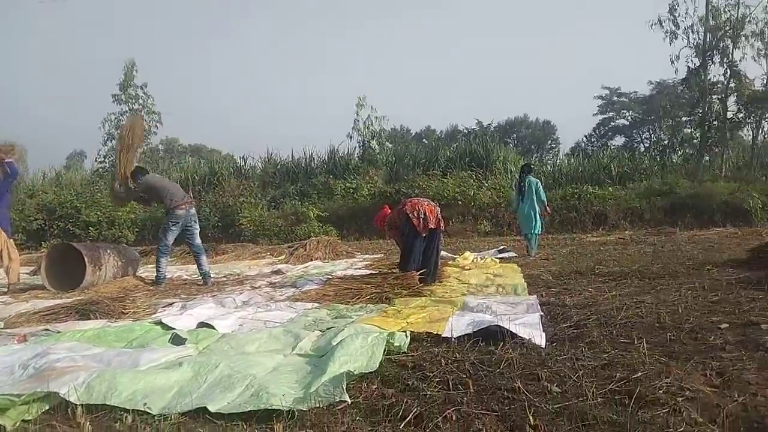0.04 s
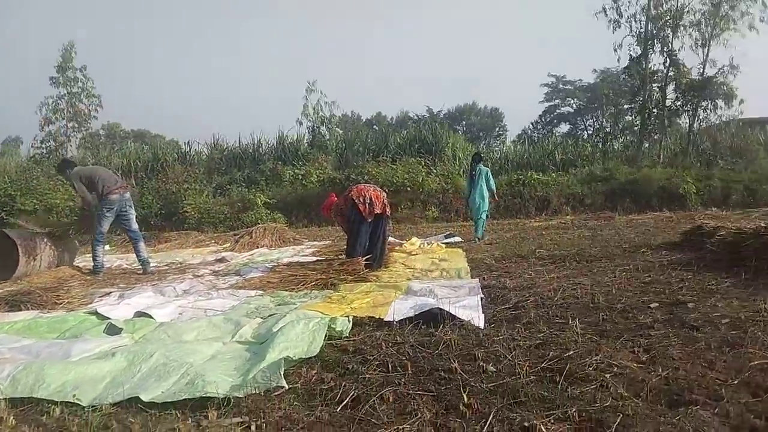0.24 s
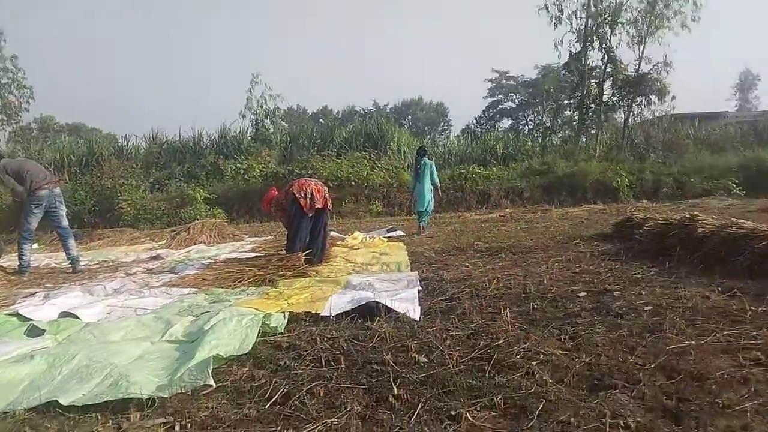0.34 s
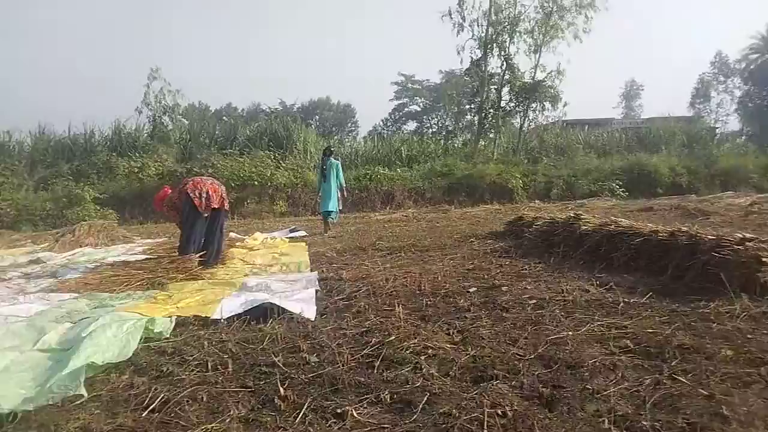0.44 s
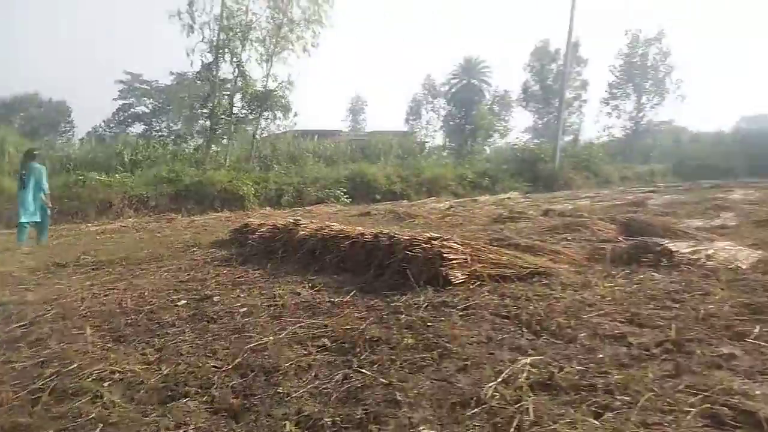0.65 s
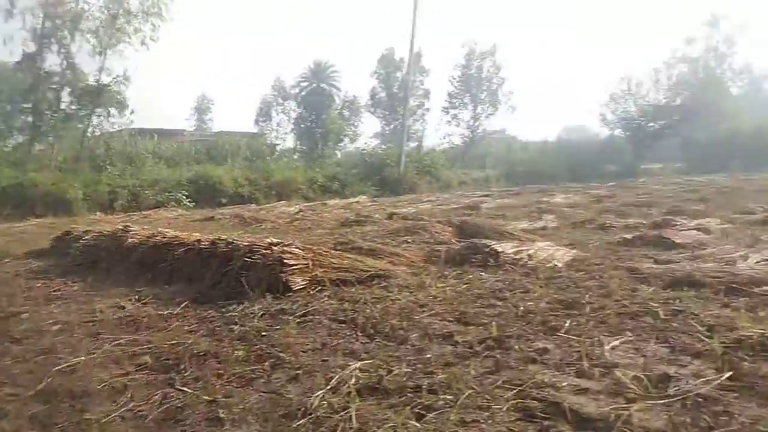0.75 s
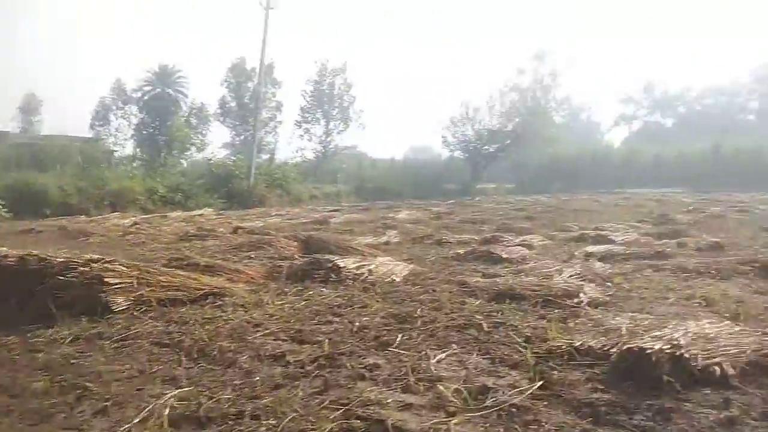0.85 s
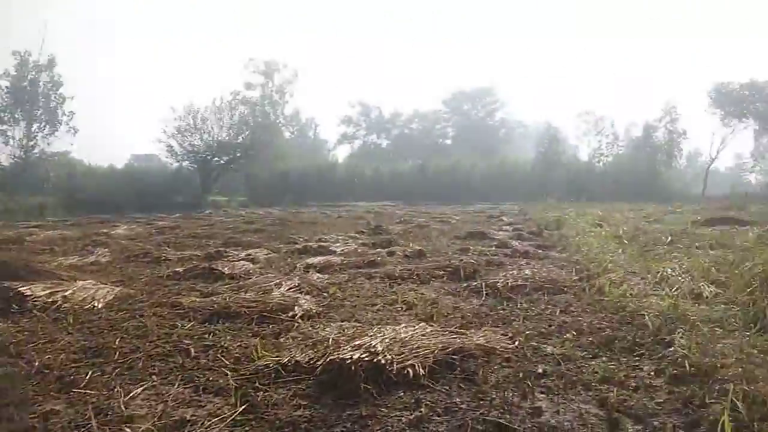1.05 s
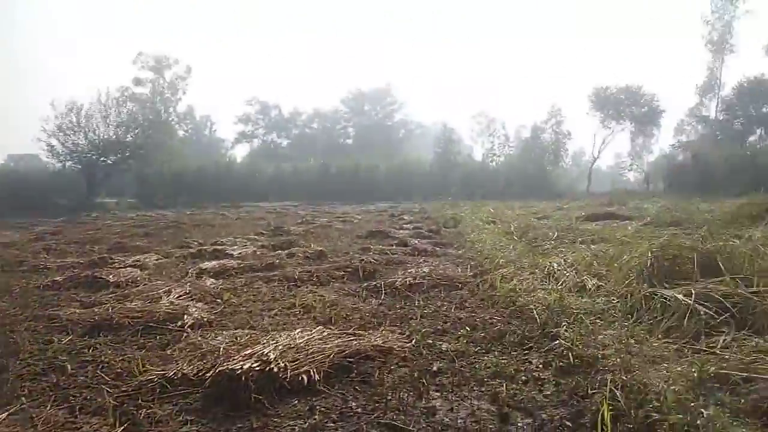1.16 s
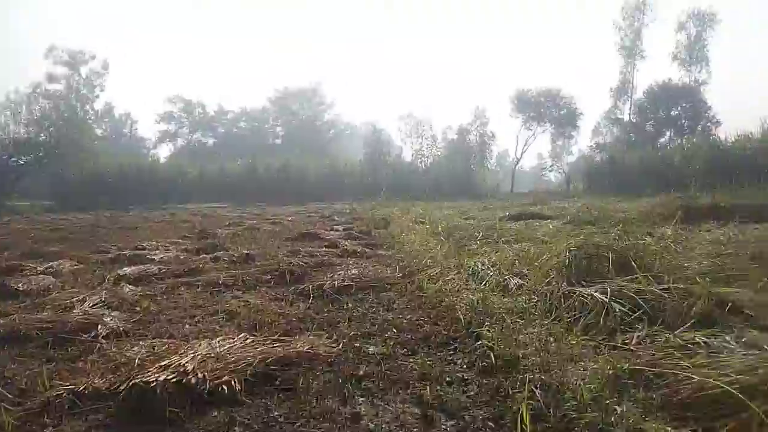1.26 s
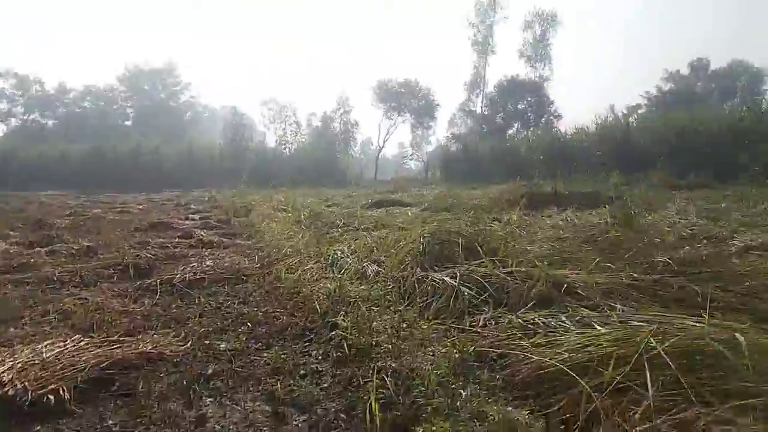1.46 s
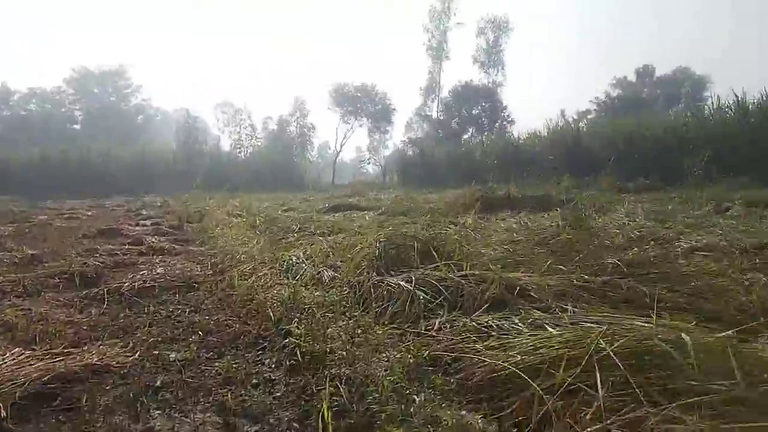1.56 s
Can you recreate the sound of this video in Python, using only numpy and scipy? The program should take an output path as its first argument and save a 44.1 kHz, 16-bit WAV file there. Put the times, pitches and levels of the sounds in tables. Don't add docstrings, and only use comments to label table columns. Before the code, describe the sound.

Rice sheaves are beaten on a hollow steel drum in an open field. Faint low engine throb and thin airy hiss run throughout. At about 0.25 s a bright slap of stalks booms and echoes, with a very faint rising swish after it; at 0.68 s a second, slightly louder, tighter blow follows. From about 1.0 to 1.6 s, close dry straw rustles, snaps and ticks increasingly.

```python
import sys
import numpy as np
from scipy import signal
from scipy.io import wavfile
from scipy.ndimage import uniform_filter1d

SR = 44100
rng = np.random.default_rng(int(sys.argv[2]) if len(sys.argv) > 2 else 0)


def invert_db(x):
    u = np.asarray(x, float) / 20
    return 10 ** u


def to_wav(sig):
    pcm = np.clip(np.atleast_2d(sig), -1, 1) * 32767
    pcm = np.round(pcm).astype(np.int16)
    wavfile.write(sys.argv[1], SR, pcm.T)


N = 70560


def evened(x):
    return x / np.sqrt(np.mean(x ** 2) + 1e-20)


def read(points, hz):
    f, value = np.transpose(points)
    return np.interp(np.log(hz + 1), np.log(f + 1), value)


def add(mix, start, sound):
    part = mix[round(start * SR):][:len(sound)]
    part += sound[:len(part)]


def grid_hz():
    return np.fft.rfftfreq(2048, 1 / SR)


def colour(x, db):
    log = np.log(invert_db(np.maximum(db, -100)))
    full = np.concatenate([log, log[-2:0:-1]])
    taps = np.fft.ifft(np.exp(full - 1j * signal.hilbert(full).imag)).real
    return signal.oaconvolve(x, taps)[:len(x)]


def ring(x, hz, width_hz):
    b, a = signal.iirpeak(hz, hz / max(width_hz, 1), fs=SR)
    return signal.lfilter(b, a, x)


def crackle(size, per_s, spread_db):
    chance, strength, sign = rng.random((3, size))
    clicks = (chance < per_s / SR) * np.sign(sign - .5)
    return evened(clicks * invert_db(-spread_db * np.log(strength * .99 + .01)))


def slow(rate_hz):
    t = np.arange(N) / SR
    rates = np.geomspace(rate_hz / 20, rate_hz, num=16)
    return evened(sum(np.sin(2 * np.pi * (f * t + rng.random())) / np.sqrt(f) for f in rates))


# frequency in Hz, level in dB per Hz.
SLAP_COLOUR = [(70, -48), (130, -16), (500, -8), (950, -19.5), (2200, -1), (4300, -11), (8000, -23.5),
               (15000, -19.5)]
# frequency in Hz, width in Hz, level in dB.
STALK_RINGS = [(1520, 160, -3), (1950, 110, -21), (2420, 170, 3.5), (3200, 300, -18), (5780, 940, -10)]


def slap(t, rise, hold, tilt_db, bundles):
    t60, treble_hz, treble_t60 = 0.13, 6100, 0.29
    bundle_s = 0.0013
    shape = np.minimum(t / rise, 1) ** 1.02 * invert_db(-60 * np.maximum(t - rise - hold, 0) / t60)
    shape *= invert_db(sum(g * np.exp(-((t - s) / bundle_s) ** 2) for s, g in bundles))
    volley = crackle(len(t), per_s=9000, spread_db=2) + 1.24 * rng.standard_normal(len(t))
    hz = grid_hz()
    sound = evened(colour(volley, read(SLAP_COLOUR, hz) + tilt_db * np.log2(hz / 2000 + .01)))
    rings = sum(invert_db(g) * ring(volley, f, w) for f, w, g in STALK_RINGS)
    sound += invert_db(-5) * evened(rings)
    body = signal.lfilter(*signal.butter(1, treble_hz, fs=SR), sound)
    treble = sound - body
    return shape * (body + treble * invert_db(2.5 - 60 * t / treble_t60))


def boom(t, rise, hold, drum):
    rise_cycles = 1.58
    out = np.zeros(len(t))
    for f, db, t60 in drum:
        swell = np.minimum(t / (rise + hold / 2 + rise_cycles / f), 1) ** 2
        fall = invert_db(db - 60 * np.maximum(t - rise - hold, 0) / t60)
        out += swell * fall * np.sin(2 * np.pi * (f * t + rng.random()))
    return out


# frequency in Hz, level in dB per Hz.
ECHO_COLOUR = [(60, -35), (146, -9.5), (230, -4.5), (450, -6), (897, -12), (1680, -4.5), (6510, -27),
               (15800, -54)]
# frequency in Hz, time to fall by 60 dB in seconds.
ECHO_T60 = [(100, 0.67), (300, 0.52), (700, 0.54), (1500, 0.39), (3000, 0.6), (7000, 0.31), (15000, 0.9)]


def echo(t):
    rise_s, far_db, far_stretch, far_top_hz = 0.0087, -10.5, 2.64, 660
    noise = evened(colour(rng.standard_normal(len(t)), read(ECHO_COLOUR, grid_hz())))
    f, frames, z = signal.stft(noise, SR, nperseg=256)
    fall_db = -60 * frames / read(ECHO_T60, f)[:, None]
    far = invert_db(far_db + fall_db / far_stretch) / (1 + (f[:, None] / far_top_hz) ** 6)
    tail = signal.istft(z * (invert_db(fall_db) + far), SR, nperseg=256)[1][:len(t)]
    return np.minimum(t / rise_s, 1) * tail


# start in seconds, slap level in dB, rise in seconds, hold in seconds,
# brightness in dB per octave.
BLOWS = [
    (0.242, -27, 0.0075, 0.013, 2.5),
    (.677, -25.5, 0.0052, 0.01, 0.9),
]
# seconds after first touch, dB over the volley
BUNDLES = [
    [(.008, 1), (.0125, 6), (.0165, 4), (.023, 2.5)],
    [(.0068, 2), (.012, 1), (.017, -2)],
]
# frequency in Hz, level in dB, 60 dB fall in seconds.
DRUM_FIRST_SPOT = [(117, 6.5, 0.035), (153, -7, 0.7), (197, -1, 0.27), (290, -8, 0.11), (395.7, 0, 0.1),
                   (381, -11.5, 0.57), (512, -4.5, 0.17), (771, 2.5, 0.07), (1100, -4.5, 0.05),
                   (1506, 3, 0.11), (1704, -2, 0.06), (1879, -10, 0.079), (2370, -15, 0.13)]
DRUM_SECOND_SPOT = [(151.2, -4, 0.11), (268, -17, 0.63), (352.6, -7.5, 0.39), (374, -8, 0.7),
                    (445, -11, 0.29), (487, -15, 0.56), (515.5, -1.5, 0.16), (600, -9.5, 0.49),
                    (651, -13.5, 0.55), (1413, -6, 0.31), (1467, -7.5, 0.33), (1601, -8, 0.4),
                    (1950, 0.5, 0.028), (2314, -1, 0.076)]
DRUM_DB = [-26.5, -27.5]
ECHO_DB = [-27.5, -27]


def blows(mix):
    t = np.arange(SR * 3 // 4) / SR
    drums = (DRUM_FIRST_SPOT, DRUM_SECOND_SPOT)
    for row, bundles, drum, drum_db, echo_db in zip(BLOWS, BUNDLES, drums, DRUM_DB, ECHO_DB):
        start, slap_db, rise, hold, tilt_db = row
        sound = invert_db(slap_db) * slap(t, rise, hold, tilt_db, bundles)
        sound += invert_db(drum_db) * boom(t, rise, hold, drum)
        sound += invert_db(echo_db) * echo(t)
        add(mix, start, sound)


# peak time in seconds, frequency in Hz, level in dB.
HEADS = [(.25, 1530, -19.5), (.2536, 2900, -20), (.2538, 1700, -20), (.2585, 1730, -14), (.2612, 2480, -18),
         (.2645, 2330, -15.5), (.2687, 1680, -23), (.2714, 1570, -31), (.2745, 1950, -25),
         (.2772, 1650, -21), (.2901, 1690, -28), (.2957, 1720, -39), (.648, 2070, -37), (.665, 3400, -42),
         (.681, 2210, -22), (.6837, 2170, -16), (.6848, 3500, -18), (.6873, 2200, -22), (.689, 2630, -19),
         (.6901, 1560, -38), (.6941, 2280, -19), (.6982, 2450, -20), (.7015, 2880, -21), (.7048, 1760, -26),
         (.7113, 1580, -25), (.716, 1520, -30), (.7196, 1550, -23.5)]
# peak time in seconds,
# frequency in Hz, level in dB.
THUMPS = [(.282, 287, -28), (.306, 188, -36), (.339, 419, -48), (.341, 156, -36), (.363, 330, -46),
          (.408, 175.3, -36.5), (.43, 258, -41), (.442, 128, -46.5), (.6905, 236, -37.5),
          (.698, 387, -31.5), (.705, 162, -33), (.72, 258, -33), (.726, 346, -30), (.728, 484, -45),
          (.7477, 600, -44), (.775, 480, -44), (.807, 366, -40), (.8345, 360, -51), (.892, 154, -49.5)]
# peak time in seconds, frequency in Hz, level in dB.
TICKS = [(1.0465, 6330, -43), (1.049, 5600, -47), (1.115, 6050, -46), (1.1175, 1175, -51.5),
         (1.131, 5450, -41), (1.1322, 3900, -40), (1.1322, 6230, -47), (1.162, 2400, -40),
         (1.172, 3040, -53), (1.2345, 6800, -55.5), (1.2767, 6310, -37.5), (1.3165, 5950, -45),
         (1.359, 3040, -42), (1.3624, 3100, -45), (1.4105, 5500, -44), (1.445, 2600, -47),
         (1.449, 3200, -46), (1.4855, 6320, -41), (1.4872, 6240, -39), (1.541, 5830, -45),
         (1.559, 5810, -43), (1.5614, 2570, -40), (1.5687, 2040, -50), (1.574, 1950, -47)]


def knocks(mix):
    for table, cycles in ((HEADS, 1.553), (THUMPS, 1.673), (TICKS, 3.53)):
        for peak, hz, db in table:
            u = np.arange(0, 9 * cycles / hz, 1 / SR) * hz / cycles
            swell = u * np.exp(1 - u)
            add(mix, peak - cycles / hz, invert_db(db) * swell * np.sin(2 * np.pi * cycles * u))


# start in seconds, length in seconds, level in dB,
# first frequency in Hz, last frequency in Hz.
SWISHES = [
    (.35, 0.21, -52, 1400, 2500),
    (.3, 0.226, -56.5, 1150, 1180),
    (1.7, 0.11, -55, 1900, 2600),
]


def swishes(mix):
    width_hz = 88
    r = np.exp(-np.pi * width_hz / SR)
    for start, length, db, from_hz, to_hz in SWISHES:
        u = np.arange(0, length, 1 / SR) / length
        a, b = rng.standard_normal((2, SR // 3))
        fuzz = a + 1j * b
        for _ in range(2):
            fuzz = signal.lfilter([1 - r], [1, -r], fuzz)
        glide = np.exp(2j * np.pi * np.cumsum(from_hz + (to_hz - from_hz) * u) / SR)
        whistle = evened((fuzz[:len(u)] * glide).real)
        add(mix, start, invert_db(db) * np.sqrt(abs(np.sin(np.pi * u))) * whistle)


# frequency in Hz, level in dB per Hz.
STRAW_COLOUR = [(1000, -55), (1350, -6), (1700, -7), (2550, 5), (4400, -4), (6260, -4.5), (10500, -24.5),
                (15000, -18)]
# time in seconds, level in dB.
STIR = [(0, -69), (.22, -83), (.33, -63), (.45, -54), (.58, -61), (.66, -57), (.8, -57), (.88, -50.5),
        (1.0, -51.5), (1.079, -54.5), (1.16, -54), (1.225, -57.5), (1.25, -54.5), (1.4, -52),
        (1.475, -55.5), (1.5, -52.5), (1.6, -59)]
# start in seconds,
# level in dB, 60 dB fall in seconds, centre frequency in Hz, rise in seconds.
SNAPS = [(0.34, -48.5, 0.26, 5600, 0.022), (0.31, -50, 0.82, 1810, 0.16), (.64, -43.5, 0.31, 2260, 0.009),
         (0.6, -49, 0.029, 3500, .002), (1.03, -43.5, 0.12, 5700, 0.014), (1.128, -45, 0.19, 5740, 0.0036),
         (1.132, -52, 0.046, 2900, 0.0036), (1.165, -43, 0.19, 2950, 0.005),
         (1.16, -47.5, 0.17, 6300, 0.009), (1.276, -49, 0.091, 6500, 0.0008), (1.355, -49, 0.1, 2880, .006),
         (1.484, -46, 0.11, 6500, 0.0016), (1.556, -46.5, 0.099, 2100, 0.0022),
         (1.567, -48.5, 0.3, 1840, 0.0033), (1.4, -61.5, 3.9, 866, 0.088), (0.5, -57.5, 1.9, 980, 0.013),
         (.84, -66, 0.66, 920, 0.038), (0.92, -68, 4.5, 505, .06), (.08, -67, 0.53, 700, 0.014)]


def straw():
    hz, (s, stir_db) = grid_hz(), np.transpose(STIR)
    grains = crackle(N, per_s=3500, spread_db=1.1) + 1.3 * rng.standard_normal(N)
    bed = evened(colour(grains, read(STRAW_COLOUR, hz)))
    out = bed * invert_db(3.0 + np.interp(np.arange(N) / SR, s, stir_db) + 1.6 * slow(60))
    t, octaves = np.arange(14000) / SR, 0.4
    for start, db, t60, centre_hz, rise in SNAPS:
        grains = crackle(len(t), per_s=3500, spread_db=1) + 0.36 * rng.standard_normal(len(t))
        band = evened(colour(grains, -6 * (np.log2(hz / centre_hz + .001) / octaves) ** 2))
        shape = np.minimum(t / rise, 1) * invert_db(db - 60 * np.maximum(t - rise, 0) / t60)
        add(out, start, band * shape)
    return out


# start in seconds, level in dB,
# 60 dB fall in seconds, tilt in dB per octave.
FIZZ = [(0.001, -54.5, 0.32, 4), (0.084, -59, .1, 2), (.11, -57.5, 0.094, -2), (0.158, -59, 0.1, -3),
        (0.344, -51, 0.32, 0.5), (.45, -61.5, .9, 3), (.75, -51, 0.18, 5), (0.801, -52.5, 0.88, 6),
        (0.971, -54, 0.55, 2), (1.096, -54, 0.045, -1), (1.115, -52.5, 0.12, -5), (1.154, -48.5, 0.092, -3),
        (1.18, -59, 0.071, 12), (1.206, -53, 0.045, 1), (1.234, -47.5, 0.21, -6.5),
        (1.254, -59, 0.15, -13.5), (1.292, -48, 0.086, -5), (1.314, -43.5, 0.11, 1),
        (1.347, -47.5, 0.22, 0.5), (1.362, -46.5, 0.1, 5.5), (1.385, -60, 0.097, -2),
        (1.41, -45, 0.081, 1.5), (1.431, -49, 0.12, -2), (1.485, -48, 0.13, 0.5), (1.51, -52, 0.12, 1),
        (1.537, -46.5, 0.11, 1), (1.558, -46, 0.13, -1.5), (1.582, -50, .12, -6)]
# frequency in Hz, level in dB per Hz.
FIZZ_COLOUR = [(2000, -32), (4500, -8), (6200, 7), (8200, -4.5), (11000, -6.5), (14000, -7), (16000, 1)]


def fizz():
    hz, t, out = grid_hz(), np.arange(12000) / SR, np.zeros(N)
    rise_s, hold = 0.0008, 0.54
    for start, db, t60, tilt_db in FIZZ:
        grains = crackle(len(t), per_s=3500, spread_db=2.1) + 0.7 * rng.standard_normal(len(t))
        tilt = tilt_db * np.log2(hz / 10000 + 0.009)
        band = evened(colour(grains, read(FIZZ_COLOUR, hz) + tilt))
        add(out, start, band * np.minimum(t / rise_s, 1) * invert_db(db - 60 * (t / (hold * t60)) ** 2))
    return out


# time in seconds, level change in dB.
LULLS = [
    (1.229, 0.5),
    (1.311, -5),
    (1.344, -6),
    (1.402, -5.5),
    (1.479, -3),
]


def lull():
    t, length_s = np.arange(N) / SR, .0035
    return invert_db(sum(db * np.exp(-((t - s) / length_s) ** 2) for s, db in LULLS))


# multiple of the base frequency, level in dB.
PUMP = [(3, -64.5), (4, -64), (5, -56), (6, -57.5), (7, -68), (8, -90)]


def pump():
    base_hz, drift, waver_db = 33.72, .0012, 3.0
    turns = np.cumsum(base_hz * (1 + drift * slow(4.6))) / SR
    out = np.zeros(N)
    for multiple, db in PUMP:
        level = np.sqrt(2) * invert_db(db + waver_db * slow(13))
        out += level * np.cos(2 * np.pi * (multiple * turns + 0.02 * slow(7.98)))
    return out


# frequency in Hz, level in dB per Hz.
HISS_COLOUR = [(60, -25.5), (100, -6), (200, -12), (280, -21.5), (550, -30), (950, -30.5), (1600, -17.5),
               (15800, -52.5)]


def field():
    hiss_db = -54.5
    shade_s, shade_span_s, shade_hz, shade_octaves, shade_db = 1.09, 0.095, 830, 0.31, -20
    f, frames, z = signal.stft(rng.standard_normal(N), SR, nperseg=1024)
    patches = uniform_filter1d(rng.standard_normal(z.shape), size=10, axis=0)
    patches = evened(uniform_filter1d(patches, size=5, axis=1))
    gain = invert_db(read(HISS_COLOUR, f)[:, None] + 1.8 * patches)
    gain /= np.sqrt(np.mean(gain[7:] ** 2))
    time_off = (frames - shade_s) / shade_span_s
    pitch_off = np.log2(f[:, None] / shade_hz + 1e-3) / shade_octaves
    gain *= invert_db(shade_db * np.exp(-time_off ** 2 - pitch_off ** 2))
    hiss = signal.istft(z * gain, SR, nperseg=1024)[1][:N]
    return invert_db(hiss_db) * hiss * invert_db(1.1 * slow(60))


def scene():
    mix = (straw() + fizz()) * lull() + pump() + field()
    blows(mix)
    knocks(mix)
    swishes(mix)
    return mix[None]


def band_limit(x):
    return signal.sosfilt(signal.butter(12, 16460, fs=SR, output="sos"), x)


def record(dry):
    low_hz, edge_hz = 60.3, 15520
    x = signal.lfilter(*signal.butter(2, low_hz, "high", fs=SR), dry)
    taps = signal.firwin(383, edge_hz, window=("kaiser", 4), fs=SR)
    mix = signal.oaconvolve(x, taps[None], "same")
    return band_limit(mix)


dry = scene()
out = record(dry)
to_wav(out)
```